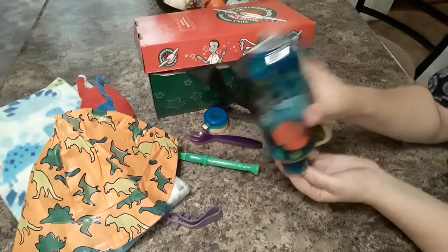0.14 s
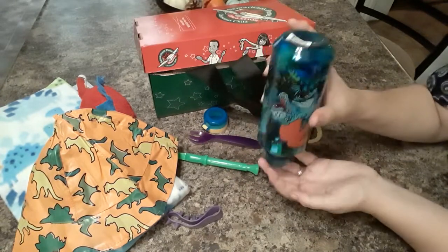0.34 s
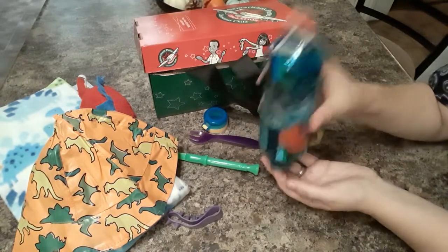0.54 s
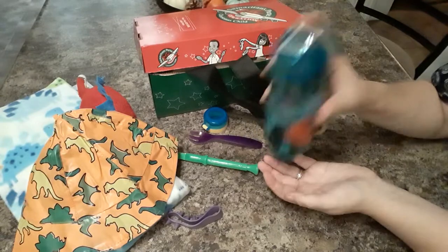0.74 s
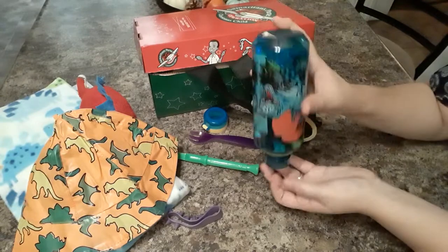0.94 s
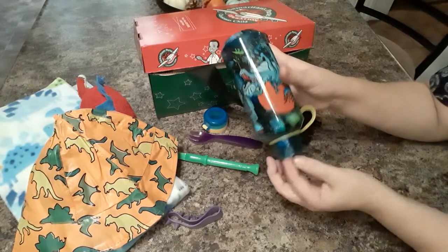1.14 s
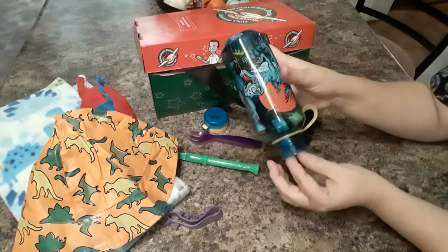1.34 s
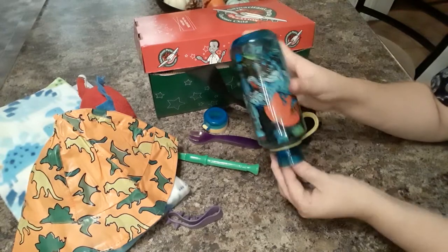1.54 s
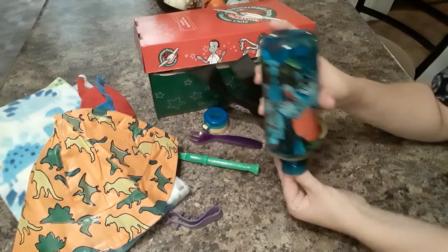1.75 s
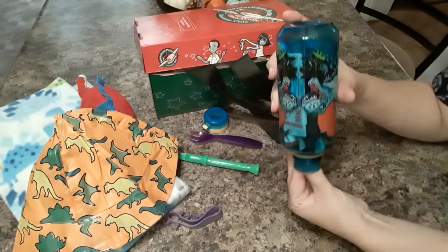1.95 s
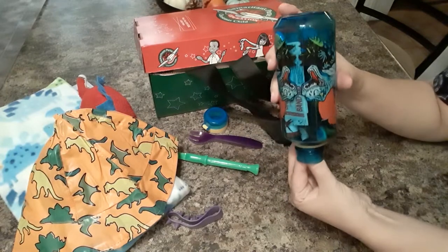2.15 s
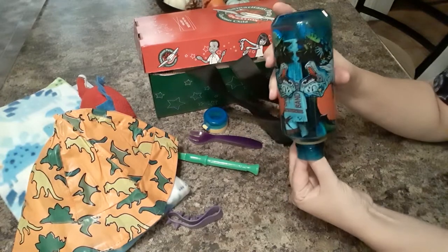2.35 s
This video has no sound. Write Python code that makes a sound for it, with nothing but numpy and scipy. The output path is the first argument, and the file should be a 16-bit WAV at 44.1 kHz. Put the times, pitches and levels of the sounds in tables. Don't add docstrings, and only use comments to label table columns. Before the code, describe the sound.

Small hard toys rattle loudly in a plastic bottle, shaken twice, then settle over faint appliance hum

```python
import sys
import numpy as np
from scipy import signal
from scipy.fft import rfft, irfft, next_fast_len
from scipy.io import wavfile
from scipy.ndimage import uniform_filter1d, map_coordinates

SR = 44100
rng = np.random.default_rng(int(sys.argv[2]) if len(sys.argv) > 2 else 0)


def voltage_ratio(level):
    return 10 ** (np.asarray(level, float) / 20)


def master_out(mix):
    frames = np.transpose(np.atleast_2d(mix))
    ceiling = np.clip(frames, -1, 1)
    pcm = np.round(ceiling * 32767).astype(np.int16)
    wavfile.write(sys.argv[1], SR, pcm)


N = 105840
SPAN = 16384
LEFT_DB = -4
TOP_HZ = 15900


def along(points, hz):
    f, v = np.transpose(points)
    return np.interp(np.log(hz + 1), np.log(f + 1), v)


def unit(x):
    return x / np.sqrt(np.mean(x ** 2) + 1e-20)


def wobble(rate):
    knots = rng.standard_normal(int(N * rate / SR) + 4)
    return map_coordinates(knots, [np.arange(N) * rate / SR])


def causal(gain):
    c = irfft(np.log(np.maximum(gain, 1e-6)))
    half = c.shape[-1] // 2
    c[..., 1:half] *= 2
    c[..., half + 1:] = 0
    return np.exp(rfft(c))


def ring(f, hz, width):
    return 1j * f * width / (hz * hz - f * f + 1j * f * abs(width) + 1e-9)


# (f/Hz, likeness 0 to 1)
ALIKE = [(150, 0.61), (1000, 0.64), (4000, 0.29)]


def rush(gain, patchy_db):
    hz, _, z = signal.stft(rng.standard_normal((2, N)), SR, nperseg=1024)
    field = uniform_filter1d(rng.standard_normal(z.shape[1:]), size=8, axis=0)
    patches = voltage_ratio(patchy_db * unit(uniform_filter1d(field, size=6, axis=1)))
    turn = np.arccos(np.clip(along(ALIKE, hz), -1, 1)) / 2
    mid_side_gain = gain(hz) * np.array([np.cos(turn), np.sin(turn)])
    z = z * patches * mid_side_gain[..., None]
    mid, side = signal.istft(z, nperseg=1024)[1][:, :N]
    return unit(np.array([mid + side, mid - side]))


# (f/Hz, level/dB per Hz)
RUMBLE_COLOUR = [(15, -63.5), (40, -34.5), (172, -8), (199, -3), (326, -12.5), (405, -6.5), (760, -24.5),
                 (1040, -55), (1760, -120)]


def rumble(gain_db):
    level_db = -57 + gain_db + 0.5 * wobble(4.4)
    return voltage_ratio(level_db) * rush(lambda hz: voltage_ratio(along(RUMBLE_COLOUR, hz)), patchy_db=0.0)


# (f/Hz, level/dB rms)
HUM_TONES = [
    (204.6, -62.5),
    (409.1, -59),
    (511, -70),
]


def hum(gain_db):
    t = np.arange(N) / SR
    total = 0
    for hz, db in HUM_TONES:
        level = voltage_ratio(db + gain_db + 0.82 * wobble(9))
        total = total + level * np.sin(2 * np.pi * hz * t + 0.21 * wobble(6.5))
    return total


# (f/Hz, level/dB per Hz)
HISS_COLOUR = [(380, -29.5), (650, -2.5), (1200, -16), (2000, -11.5), (2350, -16), (3830, -22),
               (15000, -38.5), (16500, -45)]
# (f/Hz, width/Hz, level/dB)
DUCT_HUMPS = [(2050, 200, 6.5), (4900, 300, 7), (6650, 750, 8)]


def hiss(gain_db):
    def colour(hz):
        humps_db = sum(g * np.exp(-((hz - c) / w) ** 2) for c, w, g in DUCT_HUMPS)
        return voltage_ratio(along(HISS_COLOUR, hz) + humps_db)

    return voltage_ratio(-60 + 1.2 * gain_db) * rush(colour, patchy_db=-0.7)


# (t/s, level/dB)
RECORDER_GAIN = [(0, -1), (.2, 1), (.3, 2.5), (1.0, -3), (1.15, -8), (1.4, -13.5), (1.69, -11.5),
                 (1.88, -7.5), (2.09, -6.5), (2.22, -3.5), (2.4, -1.5)]


def background():
    gain_db = np.interp(np.arange(N) / SR, *np.transpose(RECORDER_GAIN))
    appliance = rumble(gain_db) + hum(gain_db) + hiss(gain_db)
    return appliance * voltage_ratio([[LEFT_DB / 2], [-LEFT_DB / 2]])


# (start t/s, length t/s, level/dB, centre f/Hz, width/octaves)
SLIDES = [
    (0.09, 0.2, -64, 5000, .6),
    (1.4, 0.09, -80, 6600, .15),
    (1.425, 0.07, -79, 8600, .3),
    (1.41, 0.13, -74, 1150, .12),
    (1.405, 0.11, -75, 2500, .2),
]


def fingers():
    t = np.arange(N) / SR
    total = 0
    for start, length, db, hz, wide in SLIDES:
        swell = np.sin(np.pi * np.clip((t - start) / length, 0, 1) ** 0.67) ** 2
        swish = rush(lambda f: np.exp(-(np.log2((f + 1) / hz) / wide) ** 2), patchy_db=2.5)
        total = total + voltage_ratio(db + wobble(60)) * swell * swish
    return total


# (f/Hz, time to fall by 60 dB t/s)
ROOM_DECAY = [(300, 0.68), (2000, 0.31), (6000, 0.26), (14000, 0.17)]


def kitchen():
    gap_s, level_db = .006, -5.5
    hz, t, z = signal.stft(rng.standard_normal((2, SPAN)), SR, nperseg=256)
    decay = voltage_ratio(-60 * t / along(ROOM_DECAY, hz)[:, None])
    tail = signal.istft(z * decay, SR, nperseg=256)[1][:, :SPAN]
    tail = tail * (1 - np.exp(-np.arange(SPAN) / SR / gap_s))
    return voltage_ratio(level_db) * tail / np.linalg.norm(tail[0])


def low_cut(f):
    return (1j * f / (110 + 1j * f)) ** 3


def thump(db, hz):
    push_s, width_hz, room_share = 0.0013, 29, 0.27
    f = np.fft.rfftfreq(2 * SPAN, 1 / SR)
    push = np.exp(-(f * push_s) ** 2 - 2j * np.pi * f * push_s) * SR / (2 * np.pi * width_hz)
    room = 1 + room_share * rfft(kitchen()[0], 2 * SPAN)
    air = push * ring(f, hz, width_hz) * room
    level = voltage_ratio(db + 4 + LEFT_DB * np.array([[.4], [-.4]]))
    return level * irfft(low_cut(f) * air)[:SPAN]


def chatter(fade):
    burst = rng.standard_normal((3, len(fade)))
    for _ in range(4):
        z = rfft(burst * fade)
        burst = irfft(z / (np.abs(z) + 1e-9)) / (fade + .2)
    return unit(burst * fade) * np.sqrt(np.mean(fade ** 2))


def contact_force(f, fade):
    rebounds_per_s, rebound_db, rebound_t60_s, spread_db = 500, -21, .12, 3
    t = np.arange(SPAN) / SR
    chance, luck = rng.random((2, SPAN))
    hits = np.clip((rebounds_per_s / SR - chance) * 200, 0, 1)
    ticks = hits * voltage_ratio(-spread_db * np.log(luck + .02) - 60 * t / rebound_t60_s)
    tick_swell = signal.fftconvolve(ticks, fade[::3])[:SPAN]
    rebounds = voltage_ratio(rebound_db) * tick_swell * rng.standard_normal((3, SPAN))
    force = rfft(chatter(fade), 2 * SPAN) + rfft(rebounds, 2 * SPAN)
    apart = .35 * f ** 2 / (f ** 2 + 2500 ** 2)
    return np.sqrt(1 - apart) * force[0] + np.sqrt(apart) * force[1:]


# (f/Hz, width/Hz, level/dB)
WALL_MODES = [(860, 150, -14), (1607, 190, -2), (1680, 79, 2.5), (1760, 50, 2), (2310, 70, 1),
              (2444, 70, 0), (3030, 550, -15.5), (3207, 68, -1), (3900, 230, -3.5), (4850, 240, -7.5),
              (5580, 460, -8), (6300, 270, -5.5), (7070, 400, -8.5)]
# (f/Hz, level/dB)
SNAP_COLOUR = [(180, -22.5), (300, -22), (671, -12), (1690, -6.5), (2360, -5), (7020, -12), (15200, -22),
               (16500, -46.5)]


def bottle_wall(f, bright, spot_db, top_hz):
    each_hit_db = 2.5 * rng.standard_normal(len(WALL_MODES))
    each_ear_db = 2 * rng.standard_normal((2, len(WALL_MODES)))
    scatter = each_hit_db + each_ear_db
    modes = 0
    for k, (hz, width, db) in enumerate(WALL_MODES):
        modes = modes + (-1) ** k * voltage_ratio(db + scatter[:, k, None]) * ring(f, hz, width)
    snap = voltage_ratio(along(SNAP_COLOUR, f) + 1.5 + .7 * min(bright, 0))
    tilt_top_hz = 7000 if bright > 0 else TOP_HZ
    colour_db = spot_db + bright * np.log2(np.clip(f, 1500, tilt_top_hz) / 2500)
    softness = np.hypot(1, (f / top_hz) ** 3)
    return causal(np.hypot(np.abs(modes), snap) * voltage_ratio(colour_db) / softness)


def placed(f):
    side = np.array([[.5], [-.5]])
    lead_db = LEFT_DB + .8 * rng.normal() + 4 / (1 + (7500 / (f + 1)) ** 8)
    lag_s = .00005
    return voltage_ratio(lead_db * side + 4.0) * np.exp(-2j * np.pi * f * lag_s * (side + .5))


def knock(db, bright, spots, top_hz):
    contact_s, rise_s = 0.003, .00012
    t, f = np.arange(SPAN) / SR, np.fft.rfftfreq(2 * SPAN, 1 / SR)
    fade = (np.exp(-(t / contact_s) ** 2) * (1 - np.exp(-t / rise_s)))[:256]
    force = contact_force(f, fade)
    spot_db = sum(10 * np.exp(-(np.log2((f + 1) / hz) / .12) ** 2) for hz in spots)
    wall = bottle_wall(f, bright, spot_db, top_hz)
    wall = wall / np.abs(irfft(wall * force)[:, :220]).max()
    room_colour = causal(voltage_ratio((0.37 - 1) * spot_db))
    far = rfft(kitchen(), 2 * SPAN) * np.linalg.norm(fade) * room_colour
    return voltage_ratio(db) * irfft(low_cut(f) * placed(f) * wall * (force + far))[:, :SPAN]


# (t/s, peak level/dB, brightness/dB per octave, first spot f/Hz, second spot f/Hz)
SHAKE_ONE = [(.2381, -4, 3.5, 2000, 5996), (.2412, -9, 0, 1700, 3240), (.2452, -6.5, -1.5, 1680, 3310),
             (.252, -6, 1.5, 2300, 3600), (.2553, -4.5, 2, 1650, 6200), (.2601, -9, 0, 2400, 3165),
             (.2656, -0.5, 1.5, 1600, 2297), (.2697, -5, 0.5, 2290, 3280), (.2735, -5, 2, 2380, 1700),
             (.2787, -12, 2, 2310, 6114), (.2927, -14.5, -1, 2370, 3270), (.3049, -8.5, 6, 4820, 6522),
             (.311, -8.5, 1, 1100, 2300), (.3135, -9, 1.5, 2400, 1406), (.3205, -14.5, 3, 1770, 4160),
             (.374, -25, 2.5, 1730, 2398), (.3869, -21.5, 0.5, 1900, 2400), (.4053, -10, 0.5, 3200, 4100),
             (.4199, -22, 1.5, 1690, 3850), (.4248, -23, 0.5, 1680, 2400), (.4502, -17.5, 3.5, 2220, 3484),
             (.4672, -30, -2, 1950, 2400), (.5229, -33, -1, 2370, 1004), (.5305, -30.5, -1, 2060, 3500),
             (.5364, -31, -3, 1710, 3900), (.5487, -16.5, 3, 2470, 6220), (.554, -11, 3, 4100, 5980)]
# (t/s, peak level/dB, brightness/dB per octave, first spot f/Hz, second spot f/Hz)
SHAKE_TWO = [(0.6363, -13.5, 0.5, 2050, 5000), (0.6398, -6, -2, 2120, 5800), (0.6643, 0, -1.5, 1522, 2860),
             (0.6717, -12.5, -1, 2500, 1700), (.6781, -17, 1.5, 2570, 3470), (0.683, -15, -4, 1760, 2480),
             (0.697, -29.5, -2.5, 2700, 1731), (0.7103, -27.5, -1.5, 1710, 2611),
             (0.7283, -9.5, 5.5, 5900, 6965), (0.7324, -5.5, 3.5, 5000, 6200),
             (0.7392, -13, 0.5, 3890, 7010), (.7453, -17, -1.5, 1740, 3890), (0.7824, -24.5, 0, 2380, 4000),
             (0.801, 0, 1, 5450, 3210), (0.8093, -8.5, 0.5, 5500, 3190), (0.8175, -12.5, 0.5, 1700, 5500),
             (.8281, -18, -1, 1790, 3300), (.839, -7.5, -1, 1680, 3200), (0.8465, -19, -1, 2400, 1700),
             (.875, -22, 0, 2400, 1000), (0.884, -14, -1.5, 1786, 2070), (.8893, -16.5, -2, 2370, 1000),
             (.9096, -13, 1, 1000, 6850), (.9222, -9.5, 2, 3790, 4330), (.94, -26, -0.5, 3300, 4210),
             (0.9477, -30, 2, 3850, 4077), (1.0104, -35.5, 4.5, 1740, 4010)]
# (t/s, peak level/dB, brightness/dB per octave, first spot f/Hz, second spot f/Hz)
SETTLE = [(.225, -45, 1, 2250, 6500), (1.0464, -39, -3, 1700, 4060), (1.0514, -30, 1, 3760, 6700),
          (1.1149, -45, -1, 600, 7000), (1.1359, -51, -3, 900, 2470), (1.2033, -58, -2, 2340, 6500),
          (1.4086, -58, -11, 2360, 2000), (1.503, -67, -19, 1150, 1100), (1.5933, -62, -16, 1800, 1900),
          (1.6168, -59, -16, 1740, 1900), (1.629, -65, -16, 1850, 1900), (1.666, -59, -16, 1850, 1900),
          (1.6835, -63, -19, 1862, 1900), (1.7685, -51, -14, 1780, 2000), (1.8105, -53, -12, 1730, 3000),
          (1.8281, -32, -1, 1100, 4100), (2.3197, -54, -12, 1690, 2000), (2.3352, -51, -12, 1450, 2200)]
# (t/s, peak level/dB, pitch f/Hz)
THUMPS = [(0.239, -23, 286.5), (0.265, -24.5, 284), (0.292, -26, 285), (0.313, -16.5, 267.4),
          (0.372, -34.5, 254), (0.405, -40, 276.5), (0.436, -32, 278), (0.451, -36, 263),
          (0.508, -48.5, 263), (0.554, -31.5, 259.4), (0.636, -25.5, 308), (0.665, -24.5, 277.5),
          (0.724, -22.5, 270.7), (0.734, -29, 244), (0.801, -24.5, 267.3), (0.84, -31.5, 293),
          (0.885, -26, 266), (0.91, -29.5, 240), (0.95, -43, 268), (0.98, -50, 254), (1.01, -53, 259),
          (1.056, -60, 231), (1.111, -50, 250)]


def bottle():
    out = np.zeros((2, N + 2 * SPAN))
    for s, db, bright, *spots in [*SHAKE_ONE, *SHAKE_TWO]:
        out[:, round(s * SR):][:, :SPAN] += knock(db - 3, bright, spots, TOP_HZ)
    for s, db, bright, *spots in SETTLE:
        out[:, round(s * SR):][:, :SPAN] += knock(db, bright, spots, top_hz=8500)
    for s, db, hz in THUMPS:
        out[:, round(s * SR):][:, :SPAN] += thump(db, hz)
    return out[:, :N]


def scene():
    preamp_hiss = voltage_ratio(-85.5) * rng.standard_normal((2, N))
    return background() + fingers() + bottle() + preamp_hiss


def band_limit(x):
    return signal.sosfilt(signal.butter(12, 16820, fs=SR, output="sos"), x)


def record(dry):
    m = next_fast_len(N + SPAN)
    top = 1 / (1 + (np.fft.rfftfreq(m, 1 / SR) / TOP_HZ) ** 80)
    mix = irfft(rfft(np.tanh(dry), m) * top, m)[:, :N]
    return band_limit(mix)


dry = scene()
out = record(dry)
master_out(out)
```